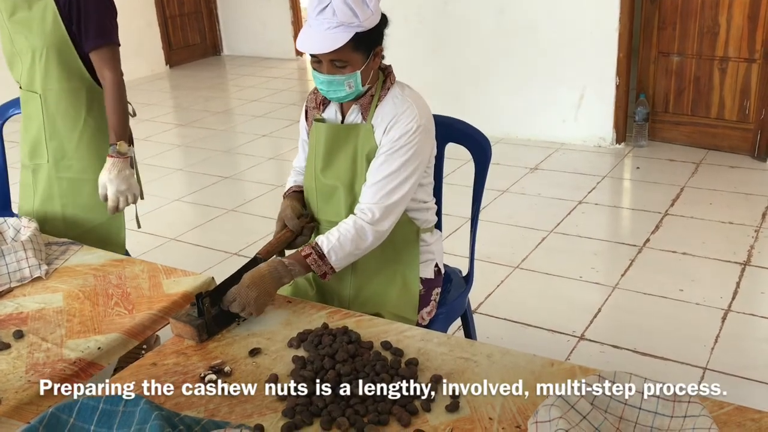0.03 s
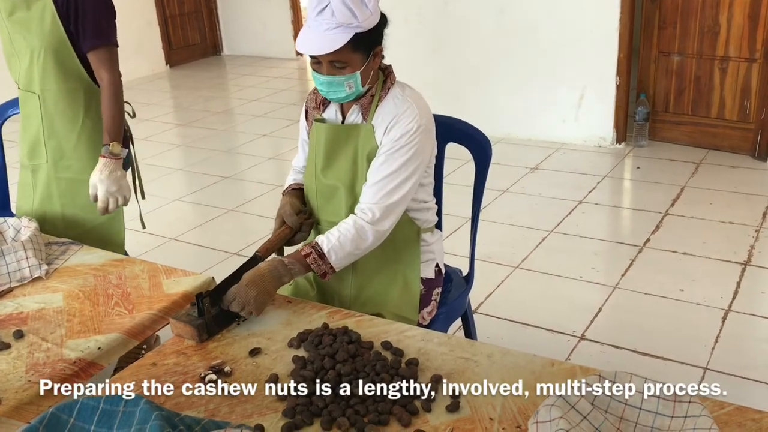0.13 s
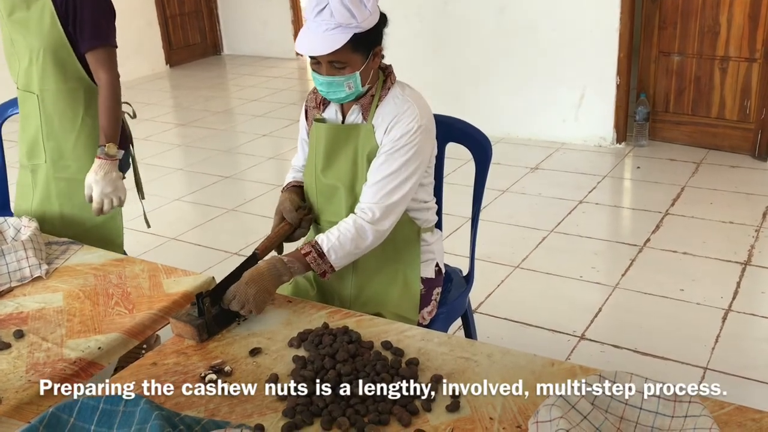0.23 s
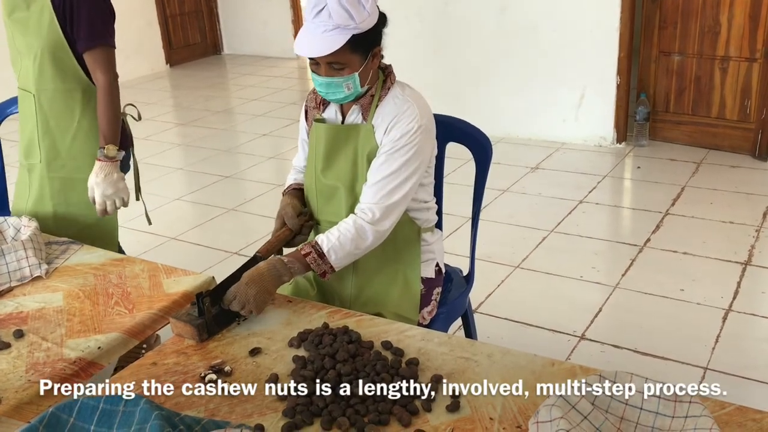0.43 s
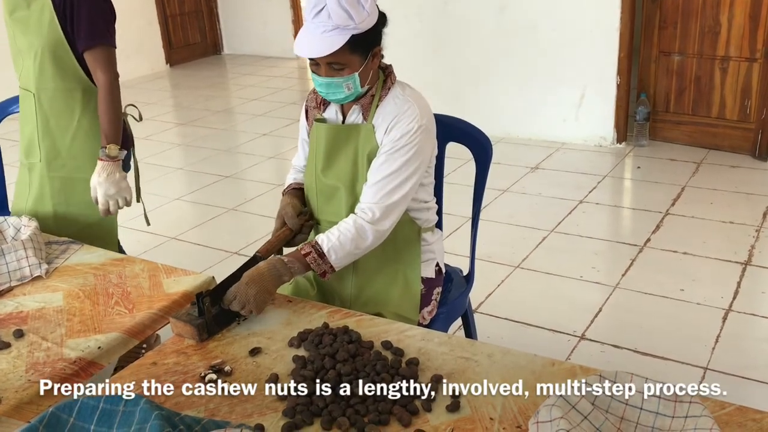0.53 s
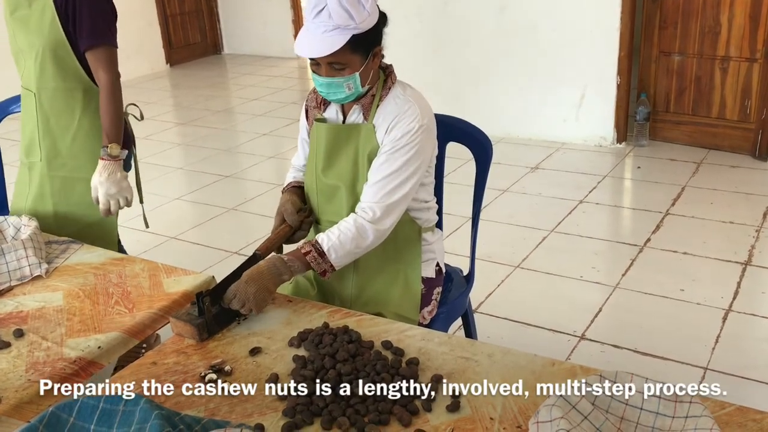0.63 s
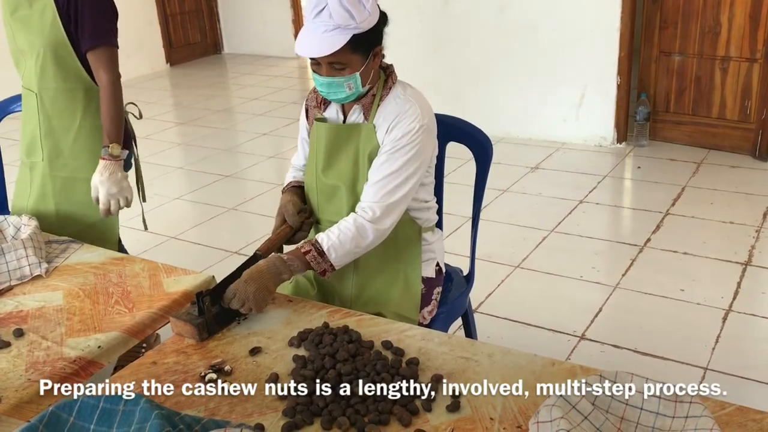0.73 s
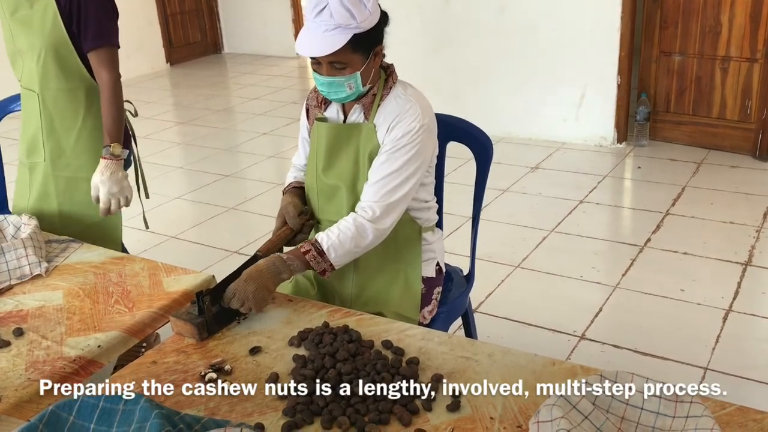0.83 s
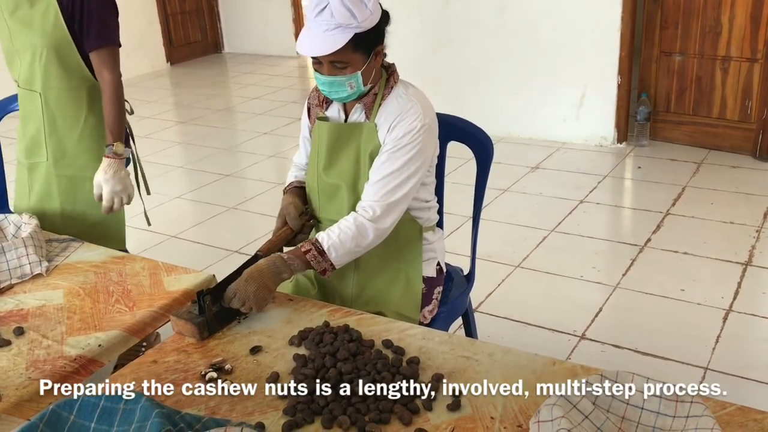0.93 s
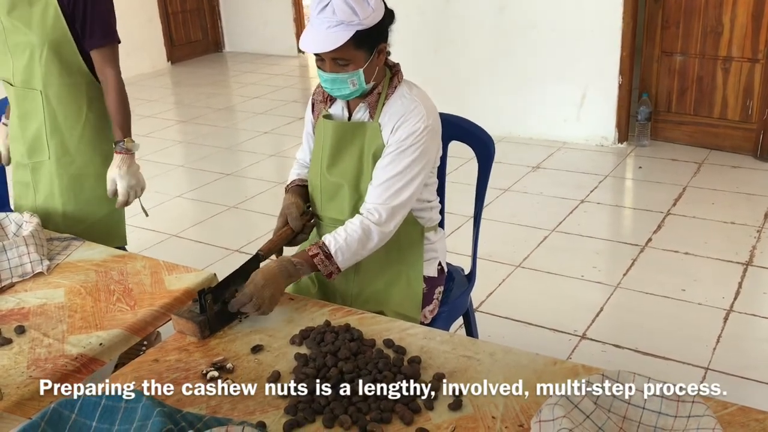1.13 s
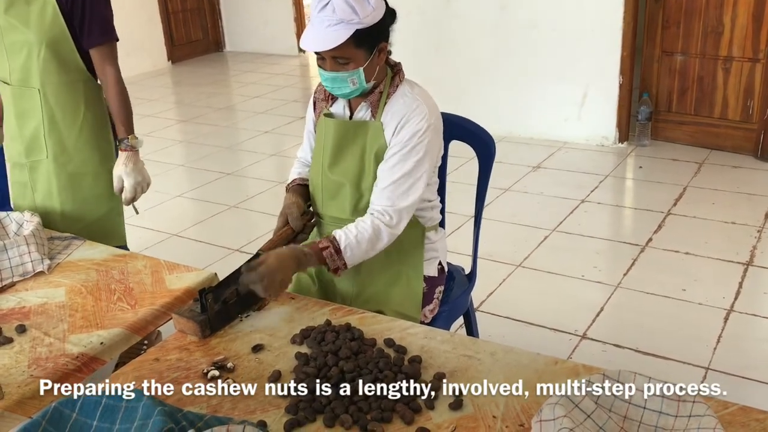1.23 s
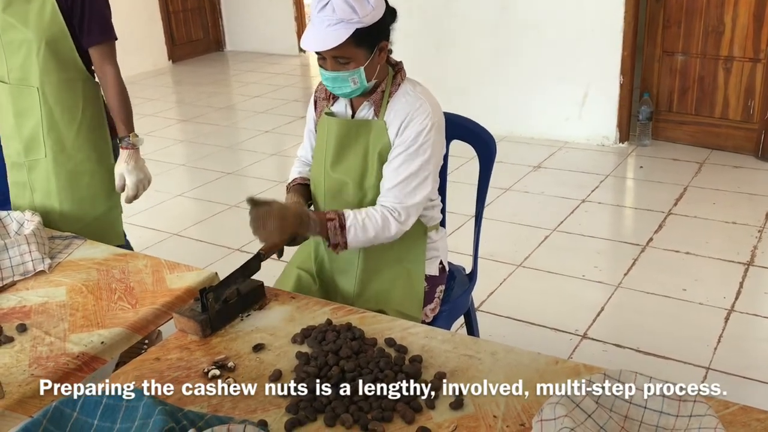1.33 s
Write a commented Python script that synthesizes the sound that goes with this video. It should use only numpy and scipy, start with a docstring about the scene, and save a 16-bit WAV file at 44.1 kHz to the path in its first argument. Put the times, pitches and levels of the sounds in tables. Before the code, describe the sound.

One sharp crack of a nut shell in a lever cutter is followed by a quick rattle of hard bits scattering on a wooden tabletop. The nearby impacts ring through a tiled room and fade over a faint low hum.

```python
"""Over faint hiss and a low hum, a lever cutter snaps through a nut's shell.
Hard pieces then clatter over a wooden table, with small rebounds in between and a few last clinks.
Each impact excites damped modes of the table top and a burst of cracking noise in the shell.
A bare tiled room prolongs every contact as reverberation."""
import sys
import numpy as np
from scipy import signal
from scipy.fft import rfft, irfft
from scipy.io import wavfile

SR = 44100
rng = np.random.default_rng(int(sys.argv[2]) if len(sys.argv) > 2 else 0)


def unload_wav(signal):
    """Save mono or channel-first audio to the path in sys.argv[1] as 16-bit WAV at rate SR, clipped to [-1, 1]."""
    wavfile.write(
        sys.argv[1],
        SR,
        np.round(np.clip(np.atleast_2d(signal).T, -1, 1) * 32767).astype(np.int16),
    )


N = 61739


def undb(db):
    """Amplitude ratio of a level in decibels."""
    return 10 ** (np.asarray(db) / 20)


def unit(x):
    """Normalisation to an rms of 1."""
    return x / np.sqrt(np.mean(x ** 2))


def on_log_axis(points, hz):
    """Interpolation of (frequency [Hz], value) points over log frequency."""
    f, v = np.array(points, float).T
    return np.interp(np.log(np.maximum(hz, 1)), np.log(f), v)


def envelope(points):
    """Amplitude envelope through (time [s], level [dB]) points."""
    return undb(np.interp(np.arange(N) / SR, *np.array(points).T))


def noise(spectrum):
    """Spectral shaping of white noise, at an rms of 1."""
    gain = undb(on_log_axis(spectrum, np.fft.rfftfreq(N, 1 / SR)))
    return unit(irfft(rfft(rng.standard_normal(N)) * gain, N))


def decay(t, t60):
    """Exponential damping: 60 dB in t60 seconds."""
    return np.exp(-np.log(1000) * t / t60)


def add(out, start_s, sound):
    """Superposition of a sound from the given time on."""
    i = int(np.clip(start_s * SR, 0, N - 1))
    out[i:i + len(sound)] += sound[:N - i]


def high_pass(x, hz):
    """Second-order attenuation below hz."""
    return signal.sosfilt(signal.butter(2, hz, "high", fs=SR, output="sos"), x)


# spectra of room air and hiss (frequency [Hz], relative level [dB])
AIR_SPECTRUM = [(25, -28), (65, -6.5), (100, -14.5), (135, -5.5), (250, -9), (420, -17), (700, -24.5),
                (1350, -23.5), (3000, -30), (11400, -37), (16000, -34.5)]
HISS_SPECTRUM = [(500, -59), (3000, 3), (6000, 2.5), (7500, -2.5), (10000, -1.5), (13500, -4.5),
                 (16000, -5.5)]
# envelopes of air, hiss and hum (time [s], level [dB])
AIR_ENVELOPE = [(0, -58.5), (.2, -58.5), (.6, -53), (1.1, -59.5), (1.4, -62)]
HISS_ENVELOPE = [(0, -78), (.9, -66), (1.25, -61.5), (1.4, -58)]
HUM_ENVELOPE = [(0, -65), (.6, -71), (.8, -55), (1.1, -58), (1.4, -55.5)]

def background(hum_hz=124, half_width_hz=36, waver=0.55):
    """Noise floor: broadband air and hiss, and a hum that wavers by beating with narrowband noise."""
    t, hz = np.arange(N) / SR, np.fft.rfftfreq(N, 1 / SR)
    narrowband = unit(irfft(rfft(rng.standard_normal(N)) / (1 + ((hz - hum_hz) / half_width_hz) ** 4), N))
    hum = unit(np.sin(2 * np.pi * hum_hz * t) + waver * narrowband)
    air = noise(AIR_SPECTRUM) * envelope(AIR_ENVELOPE)
    hiss = noise(HISS_SPECTRUM) * envelope(HISS_ENVELOPE)
    return air + hiss + hum * envelope(HUM_ENVELOPE)


ATTACK_S, KNOCK_RISE_S, MODE_SPREAD = 0.00071, 0.0014, 0.017
# modes of the table top (frequency [Hz], level relative to the knock tone [dB], decay time T60 [s])
TABLE_TOP_MODES = [(275.5, -33.5, 0.066), (389.4, -27.5, 0.039), (567.5, -28.5, 0.033), (707.5, -22, 0.041),
                   (823, -25, 0.046), (1058.5, -16.5, 0.03), (1407, -24, 0.06), (1652, -17.5, 0.035),
                   (2040, -19, .025), (2795, -31, 0.075), (3777, -30.5, 0.053)]
# spectra of the noise bursts of an impact (frequency [Hz], relative level [dB])
THUD_SPECTRUM = [(60, -52), (150, -20), (280, -8.5), (430, -4), (505, -32), (600, -14.5), (700, -6.5),
                 (900, -4), (1400, 5), (1750, 4.5), (2300, -13), (4000, -62)]
CRACK_SPECTRUM = [(100, -58), (900, -20), (1700, 0), (2400, 1.5), (3150, -5.5), (3800, -2.5), (4600, -8),
                  (5600, -8.5), (6600, -21.5), (10000, -31)]
TICK_SPECTRUM = [(500, -59), (3000, 3), (6000, 2.5), (7500, -2.5), (10000, -1.5), (13500, -4.5),
                 (16000, -5.5)]

def impacts(rows, mix_db):
    """Impact excitation: a knock tone and damped table modes, with a thud, shell crack and bright tick."""
    size = SR // 10
    t, out = np.arange(size) / SR, np.zeros(N)
    attack = 1 - np.exp(-(t / ATTACK_S) ** 2)
    knock_rise = 1 - np.exp(-(t / KNOCK_RISE_S) ** 2)
    thud, crack, tick = noise(THUD_SPECTRUM), noise(CRACK_SPECTRUM), noise(TICK_SPECTRUM)
    ring_gain, thud_gain, crack_gain, tick_gain = undb(mix_db)
    for start, knock_db, crack_db, tick_db, knock_hz in rows:
        first = rng.integers(N - size)
        part = slice(first, first + size)
        ring = decay(t, t60=0.014) * np.sin(2 * np.pi * knock_hz * t)
        for hz, db, t60 in TABLE_TOP_MODES:
            detune = np.exp(MODE_SPREAD * rng.standard_normal())
            sign = rng.choice([-1, 1])
            ring += sign * undb(db) * decay(t, t60) * np.sin(2 * np.pi * hz * detune * t)
        knock = undb(knock_db) * (ring_gain * ring + thud_gain * thud[part] * decay(t, t60=0.034))
        shell = undb(crack_db) * crack_gain * crack[part] * decay(t, t60=0.037)
        bright = undb(tick_db) * tick_gain * tick[part] * decay(t, t60=0.024)
        add(out, start, knock_rise * knock + attack * (shell + bright))
    return high_pass(out, hz=186)  # the table radiates little bass


SNAP_MIX_DB = (7.5, -13, -0.5, 4)  # gains of ring, thud, crack, tick
# snaps, before those gains (time [s], knock [dB], crack [dB], tick [dB], knock frequency [Hz])
CUTTER_SNAPS = [(.1242, -76.5, -51, -73, 1350), (.2133, -11.5, -21.5, -35, 1320),
                (.2362, -20, -34, -59, 1370)]

def cutter():
    """Brittle fracture: the blade bites, snaps through the shell and rebounds."""
    return impacts(CUTTER_SNAPS, SNAP_MIX_DB)


# reverberation time of the room (frequency [Hz], T60 [s])
REVERB_T60 = [(150, 0.52), (500, 0.88), (1400, 1.2454), (3000, 0.84), (6000, 0.28), (14000, 1)]
# spectrum of the reverberant tail (frequency [Hz], relative level [dB])
REVERB_SPECTRUM = [(100, -12), (240, -1), (380, 2), (500, -1), (580, 9), (750, 4), (1050, -1), (1400, -2),
                   (2500, -.5), (5000, -1.5), (8000, 2), (15000, -8.5)]

def room(x, tail_db=-1.3, early_db=-10.5, onset_s=0.007):
    """Reverberation: early reflections, then a diffuse tail in which each octave decays at its own rate."""
    t, hz = np.arange(N) / SR, np.fft.rfftfreq(N, 1 / SR)
    spectrum = rfft(rng.standard_normal(N)) * undb(on_log_axis(REVERB_SPECTRUM, hz))
    tail = np.zeros(N)
    for centre_hz in 62.5 * 2 ** np.arange(9):
        band = np.clip(1 - abs(np.log2(np.maximum(hz, 1) / centre_hz)), 0, 1)
        tail += irfft(spectrum * band, N) * decay(t, on_log_axis(REVERB_T60, centre_hz))
    tail *= np.sqrt(2 * np.log(1000) / SR)  # unit energy for white noise with a T60 of 1 s
    early = unit(rng.standard_normal(N) * decay(t, t60=0.1)) / np.sqrt(N)
    onset = 1 - np.exp(-(t / onset_s) ** 2)
    response = (undb(tail_db) * tail + undb(early_db) * early) * onset
    return signal.fftconvolve(x, response)[:N]


LANDING_MIX_DB = (6.5, -7.5, 0, 2)  # gains of ring, thud, crack, tick
# landings, before those gains (time [s], knock [dB], crack [dB], tick [dB], knock frequency [Hz])
PIECE_LANDINGS = [(0.325, -20.5, -26.5, -27.5, 1550), (0.3285, -14, -23.5, -32.5, 1390),
                  (0.348, -17.5, -23, -35, 1290), (0.355, -15.5, -25, -31.5, 1756),
                  (0.3675, -24.5, -44, -52.0, 1640), (0.381, -19.5, -29.5, -44, 1400),
                  (0.3955, -18.5, -34, -37, 1470), (0.4053, -11.5, -26, -32, 1653),
                  (0.4075, -22.5, -30, -36, 1460), (0.4145, -16.5, -29, -43, 1590),
                  (0.4195, -30, -23, -51.5, 1400), (0.427, -22, -36, -39.5, 1290),
                  (0.4315, -15, -27, -39, 1330), (0.4383, -16.5, -38, -48, 1430),
                  (0.4615, -15.5, -19.5, -40, 1370), (0.4683, -13, -21.5, -26, 1480),
                  (0.4715, -38, -18.5, -26.5, 1470), (0.481, -20, -42, -34, 1440),
                  (0.4855, -14, -17, -25, 1340), (0.4885, -17.5, -28, -29, 1330),
                  (0.497, -24, -27.5, -35, 1600), (0.505, -18.5, -27, -33, 1435),
                  (0.529, -22, -24.5, -41, 1390), (0.556, -21.5, -25.5, -53, 1640),
                  (0.572, -21, -23, -49, 1230), (0.5882, -14.5, -24, -36, 1625),
                  (0.5915, -22, -23, -32.5, 1390), (0.6055, -23.5, -27.5, -61, 1460),
                  (0.63, -19.5, -34, -39, 1610), (0.633, -14, -25, -52.0, 1447),
                  (0.64, -25.5, -22.5, -39, 1320), (0.678, -24.5, -29.0, -40, 1460),
                  (0.6832, -16.5, -21.5, -36, 1510), (0.7127, -19.5, -24.5, -45, 1420),
                  (0.7416, -16, -23.5, -64, 1437), (0.749, -26, -25.5, -65, 1430),
                  (0.767, -25.5, -28, -49, 1300), (0.778, -24, -24.5, -62, 1080),
                  (0.8012, -22, -25, -48, 1430), (0.8045, -23.5, -29, -56, 1490),
                  (0.819, -34, -43, -64, 1650), (0.8708, -47, -31.0, -46.5, 1180),
                  (0.9415, -27.5, -33.5, -67, 910), (0.966, -24, -29.5, -44.5, 1570),
                  (0.988, -24.5, -30.5, -52.0, 1310), (0.9965, -23, -26.5, -42.5, 1274),
                  (0.9995, -41, -31, -56, 1500), (1.1826, -36.5, -52, -57, 1250)]

def landings(spots=4):
    """Collisions: the pieces strike a few spots of the table in turn, one track for each spot."""
    return [impacts(PIECE_LANDINGS[spot::spots], LANDING_MIX_DB) for spot in range(spots)]


# mean strength of the rebounds (time [s], relative level [dB])
REBOUND_ENVELOPE = [(.33, -38), (.395, -22), (.42, -25.5), (.5, -29), (.55, -31.5), (0.751, -27),
                    (.84, -37), (0.989, -35), (1.06, -46)]

def rebounds(count=80, spread_db=2, crack_db=-7, tick_db=-42, centre_hz=1422, pitch_spread=0.143):
    """Elastic rebound: the tumbling pieces make small impacts, random in time, strength and pitch."""
    times, levels = np.array(REBOUND_ENVELOPE).T
    starts = times[0] + (times[-1] - times[0]) * (np.arange(count) + rng.random(count)) / count
    strength, pitch = rng.standard_normal((count, 2)).T
    db = np.interp(starts, times, levels) + spread_db * strength
    hz = centre_hz * np.exp(pitch_spread * pitch)
    return impacts(np.column_stack([starts, db, db + crack_db, db + tick_db, hz]), LANDING_MIX_DB)


# ringing pieces (time [s], frequency [Hz], level [dB], decay time T60 [s])
PIECE_CLINKS = [(.871, 3300, -33, 0.013), (.9415, 2497, -27, 0.044), (.966, 3460, -32.5, 0.043),
                (.998, 2320, -34, 0.016)]

def clinks():
    """Free vibration: a few of the last pieces each ring in a single damped mode."""
    t, out = np.arange(N) / SR, np.zeros(N)
    attack = 1 - np.exp(-t / ATTACK_S)
    for start, hz, db, t60 in PIECE_CLINKS:
        add(out, start, undb(db) * attack * decay(t, t60) * np.sin(2 * np.pi * hz * t))
    return out


def scene():
    """Superposition of direct and reverberant sound; each spot has its own reflections."""
    snaps = cutter()
    pieces = sum(source + room(source) for source in [*landings(), rebounds() + clinks()])
    snap_reverb = undb(-1) * room(snaps)  # the cutter sends less into the room than the table does
    return (snaps + snap_reverb + pieces + background())[None, :]


def record(dry, low_hz=86, top_hz=15900):
    """Band limiting: filters remove the rumble and the highest treble."""
    low_pass = signal.ellip(10, .2, 80, top_hz, fs=SR, output="sos")
    return signal.sosfilt(low_pass, high_pass(dry, low_hz))


dry = scene()
out = record(dry)
unload_wav(out)
```